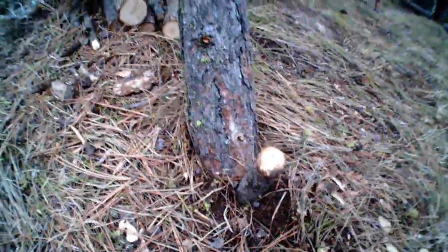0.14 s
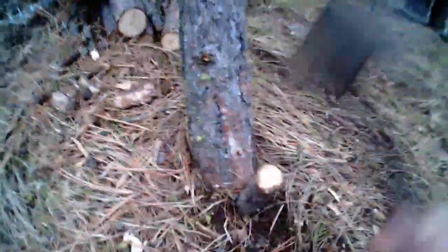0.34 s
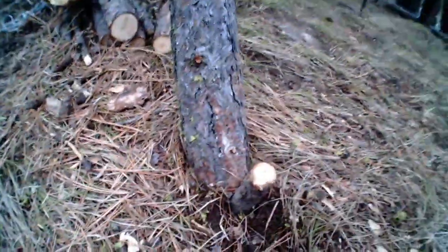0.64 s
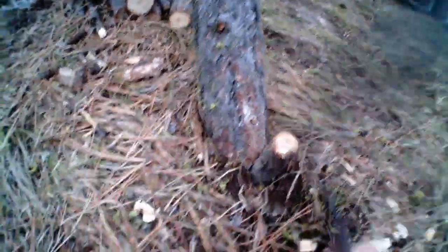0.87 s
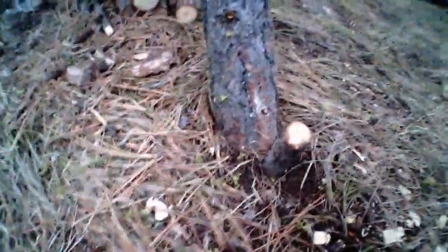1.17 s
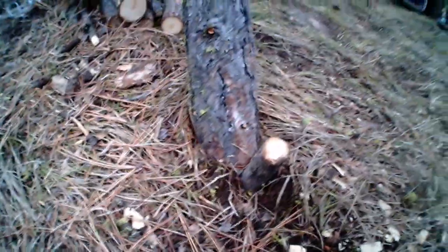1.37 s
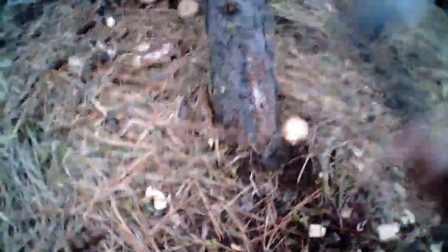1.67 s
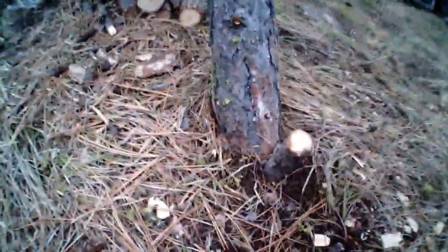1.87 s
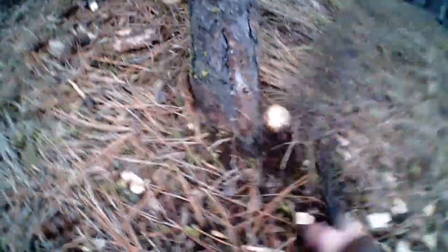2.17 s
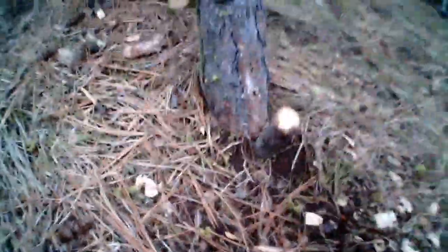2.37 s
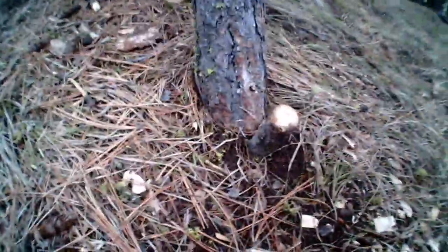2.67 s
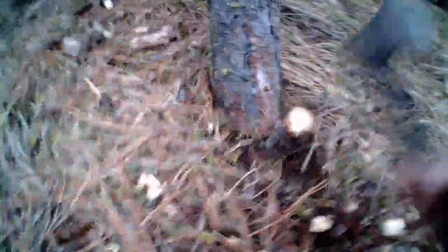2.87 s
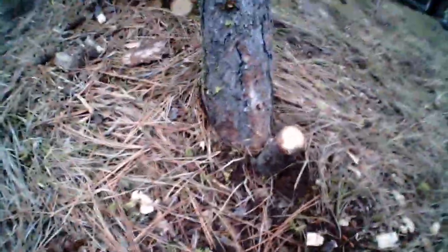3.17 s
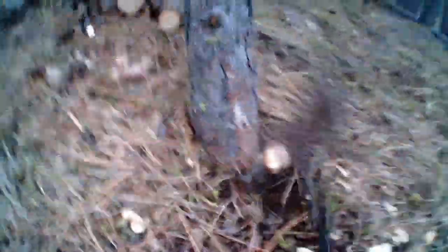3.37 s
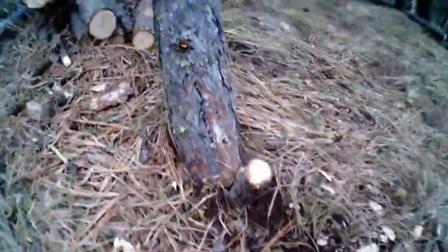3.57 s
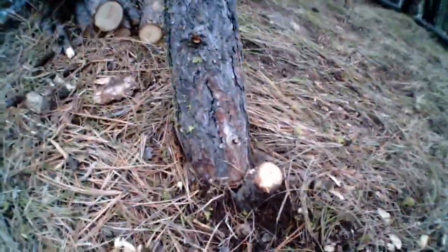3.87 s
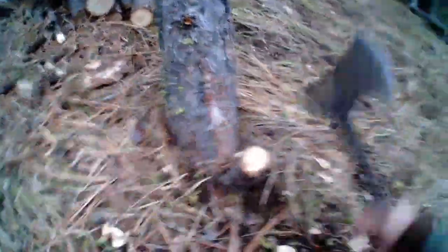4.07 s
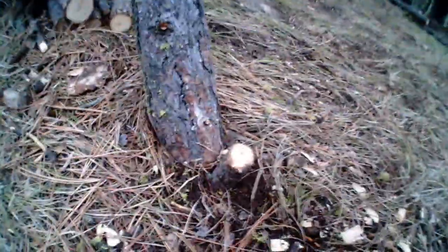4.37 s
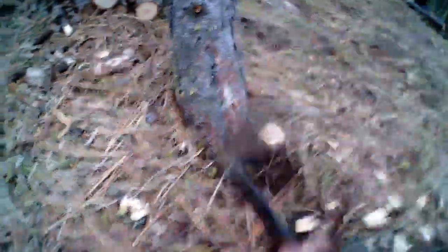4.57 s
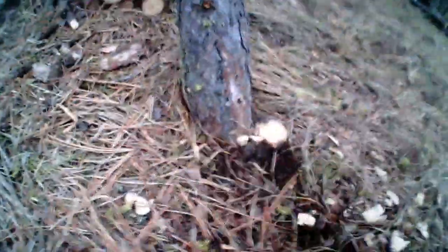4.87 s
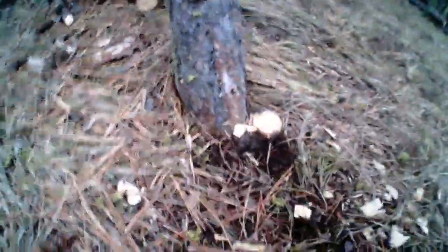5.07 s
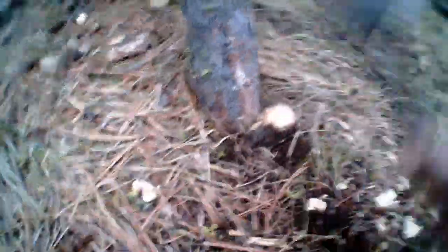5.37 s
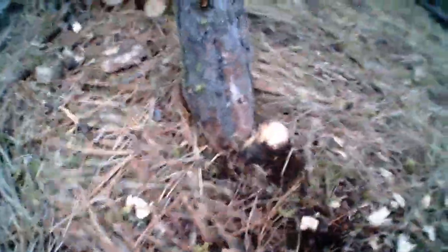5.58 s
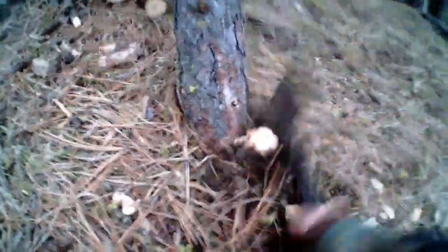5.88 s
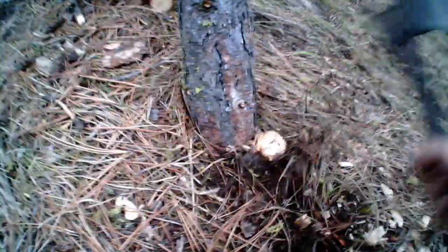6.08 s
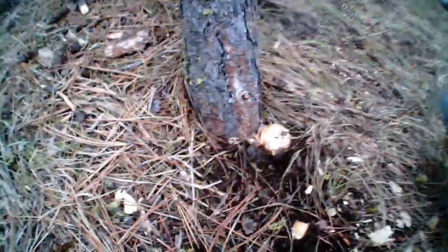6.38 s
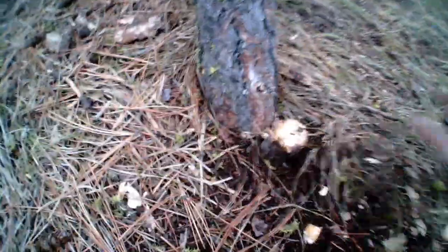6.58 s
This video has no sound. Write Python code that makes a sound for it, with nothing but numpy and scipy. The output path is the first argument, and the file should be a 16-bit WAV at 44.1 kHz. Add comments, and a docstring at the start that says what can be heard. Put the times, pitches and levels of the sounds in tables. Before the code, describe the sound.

A quiet forest bed of soft hiss and low rumble runs throughout, picked up by a small, close microphone. After a few tiny dull pops, a hatchet head strikes a wooden stake at about 0.4 seconds, then at 1.0, 1.5, 2.1, 2.6, 3.2, 3.7 and 4.3. Each swing swishes and brushes dry needles just beforehand; the blow is a loud, dry, overloaded woody crack with a short thump sinking in pitch, a brief high steel ring and a low answer from the ground. A short scattered echo and dull rustle die away, with pops and gritty crumbs between blows, clearest after 2.1, 2.7, 3.3 and 4.4. The ninth blow, near 4.9, is weaker and lands twice in quick succession. Then hammering stops: litter stirs lightly, with soft low bumps around 5.4 to 5.5, and faint rustling continues to about 6.7 seconds.

```python
"""Forest floor beside a trunk: the back of a hatchet drives a wooden stake into needle-covered ground.
Each swing swishes and brushes the litter (shaped noise); the blow cracks, thumps and rings the steel
head (decaying sines), a scattered echo follows, then crumbs fall (short noise puffs).
A quiet forest hiss and low rumble (coloured noise) lie under it all; the close, small microphone overloads."""
import sys
import numpy as np
from scipy import signal
from scipy.fft import rfft, irfft
from scipy.io import wavfile

SR = 44100
rng = np.random.default_rng(int(sys.argv[2]) if len(sys.argv) > 2 else 0)


def store_pcm(level_fs):
    """Save levels as 16-bit WAV."""
    pcm = np.round(np.clip(level_fs, -1, 1) * 32767).astype(np.int16)
    wavfile.write(sys.argv[1], SR, np.atleast_2d(pcm).T)


N = 296788
TIME_S = np.arange(N) / SR


def amp(db):
    """Decibels to gain."""
    return 10 ** (np.asarray(db, float) / 20)


def add_at(out, start_s, sound):
    """Mix a sound into out, in place, from the given time."""
    out[round(start_s * SR):][:len(sound)] += sound


def clicks(times_s, gains):
    """Single samples of the given heights, on a floor too faint to hear."""
    out = np.full(N, 1e-18)
    np.add.at(out, np.round(np.asarray(times_s) * SR).astype(int), gains)
    return out


def fade(x, t60_s):
    """A unit click becomes a level that dies away exponentially, 60 dB per t60."""
    return signal.lfilter([1], [1, -amp(-60 / (t60_s * SR))], x)


def coloured(spectrum):
    """Noise of rms 1 with the given spectrum, interpolated over log frequency."""
    hz, db = np.transpose(spectrum)
    grid_hz = np.fft.rfftfreq(N, 1 / SR) + 1    # +1 avoids log(0)
    gain = amp(np.interp(np.log(grid_hz), np.log(hz), db))
    x = irfft(rfft(rng.standard_normal(N)) * gain, N)
    return x / x.std()


def lumpy(rate_hz, depth_db):
    """A gain that wanders randomly at about the given rate: low-passed noise, read in dB."""
    knot_hz = 400
    knots = rng.standard_normal(int(N / SR * knot_hz) + 2)
    r = np.exp(-2 * np.pi * rate_hz / knot_hz)
    slow = signal.lfilter([1], [1, -r], knots) * np.sqrt(1 - r * r)
    return amp(depth_db * np.interp(TIME_S * knot_hz, np.arange(len(slow)), slow))


# microphone housing resonances: (f/Hz, width/Hz, level/dB)
HOUSING_MODES = [(1463, 280, 9), (3870, 710, -3), (6740, 530, -10.5), (9500, 1500, -35),
                 (14000, 3200, -36.5)]


def housing(x):
    """Broad parallel resonances, alternating in sign, colour bright noise near the microphone."""
    out = 0
    for k, (hz, width_hz, db) in enumerate(HOUSING_MODES):
        r = np.exp(-np.pi * width_hz / SR)
        zeros = (1 - r * r) / 2 * np.array([1, 0, -1])
        poles = [1, -2 * r * np.cos(2 * np.pi * hz / SR), r * r]
        out = out + (-1) ** k * amp(db) * signal.lfilter(zeros, poles, x)
    return out


HISS_DB = -52
# forest hiss and rumble, relative spectrum: (f/Hz, density/dB)
HISS_SPECTRUM = [(14, 2), (25, 1.5), (60, -11.5), (120, -8), (250, -15.5), (600, -19), (1900, -14.5),
                 (2700, -21), (4200, -22.5), (5500, -32.5), (7000, -30), (9500, -44), (15600, -48.5),
                 (15900, -75.5)]


def forest():
    """Steady coloured noise whose level wanders slightly."""
    return amp(HISS_DB) * coloured(HISS_SPECTRUM) * lumpy(3.8, 0.22)


SWISH_DB, SWISH_S = -37.5, 0.052
RUSTLE_DB, RUSTLE_T60_S = -19, 0.19
RUSTLE_FOLLOWS = 0.75    # dB of rustle per dB of echo
FALL_S = 0.066           # blow to loudest patter
GRAIN_DB = 2.5           # fast unevenness
DULL_TOP_HZ = 4500       # low-pass on swish and rustle
# needle noise, relative spectrum: (f/Hz, density/dB)
NEEDLE_SPECTRUM = [(150, 8.5), (400, 4.5), (1000, 1.5), (1600, 1.5), (2500, -16.5), (4000, -10.5),
                   (7000, -23.5), (11000, -26.5)]
# slow stir of the litter, livelier after the last blow: (t/s, level/dB)
STIR_LEVELS = [(0.0, -57.5), (4.85, -57.5), (5.1, -55), (5.3, -56), (5.45, -51.5), (5.6, -51.5),
               (5.79, -50.5), (5.87, -57.5), (6.05, -53), (6.2, -56.5), (6.73, -54)]
# blows on the stake, the last landing twice: (t/s, head's freedom to ring [0-1], crack level/dB,
# crack f/Hz, thump level/dB, thump starting f/Hz, share of thump f lost [0-1], thump length/s,
# ground level/dB, bend level/dB, twist level/dB, echo level/dB, falling dirt level/dB)
HITS = [(0.373, 0.98, 15.5, 1291, 6.5, 240, 0.14, 0.0049, -10.5, -15.5, -46.5, -11, -65),
        (0.9666, 0.61, 9, 1247, 5.5, 255, 0.09, 0.0058, -12, -0.5, -37, -8, -55),
        (1.5283, 0.31, 6.5, 1240, 3.5, 238, 0.05, 0.0075, -10.5, -0.5, -46, -8, -52.5),
        (2.0880, 0.65, 8, 1220, 2, 260.3, 0.2, 0.0089, -9, -2.5, -50, -9.5, -57),
        (2.6294, 0.42, 16, 1271, 7, 235.5, .04, 0.0075, -9, -5, -33, -7, -52.5),
        (3.1687, 0.3, 10.5, 1128, 11, 248, 0.14, 0.0063, -8.5, -21, -60, -10, -54),
        (3.7168, 0.7, 10, 1226, 7.5, 329, 0.62, 0.0067, -13.5, -4.5, -46, -19, -53),
        (4.2855, .9, 11, 1306, 3, 233.6, 0.09, 0.0094, -12.5, -10.5, -46, -10.5, -48),
        (4.8563, 0.74, -1, 1066, -3, 243.5, 0.03, 0.015, -16.5, -13.5, -58, -20, -51.5),
        (4.8633, 0.4, -6.5, 910, 3.5, 187.5, 0.61, 0.0084, -8, -31, -62, -41.5, -70)]


def litter():
    """Needle noise: dull swish into each blow, dull rustle dying after it, later patter of dirt, slow stir."""
    s, echo_db, dirt_db = np.transpose(HITS)[[0, 11, 12]]
    lead_s = s[:, None] - TIME_S
    swung = np.diff(s, prepend=0) > .1    # the second landing has no swing of its own
    swish = amp(SWISH_DB) * swung @ (np.exp(-(lead_s / SWISH_S) ** 2) * (lead_s > 0))
    rustle = fade(clicks(s, amp(RUSTLE_DB + RUSTLE_FOLLOWS * echo_db)), RUSTLE_T60_S)
    since = np.maximum(-lead_s, 0) / FALL_S
    patter = amp(dirt_db) @ (since * np.exp(1 - since))
    stir = amp(np.interp(TIME_S, *np.transpose(STIR_LEVELS)))
    needles = coloured(NEEDLE_SPECTRUM) * lumpy(50, 2.1) * lumpy(150, GRAIN_DB)
    dull = signal.lfilter(*signal.butter(2, DULL_TOP_HZ, fs=SR), needles)
    return dull * (swish + rustle) + needles * (patter + stir)


# dull pops, low ones like bumps on the ground: (t/s, level/dB, f/Hz)
DULL_POPS = [(0.0195, -26, 510), (0.0215, -25, 1070), (0.0405, -34, 476), (0.3575, -32, 1220),
             (0.5045, -23.5, 790), (0.8735, -35.5, 605), (0.9205, -29, 900), (0.933, -27, 960),
             (0.948, -25, 330), (1.0815, -21, 805), (1.6925, -22.5, 790), (2.2725, -26, 640),
             (2.8055, -24.5, 696), (3.2825, -28.5, 630), (3.4845, -37, 430), (3.6385, -32.5, 373),
             (3.730, -14.5, 124), (3.8465, -29.5, 460), (3.8715, -33.5, 530), (3.9485, -37.5, 750),
             (4.043, -47, 303), (4.4395, -19.5, 920), (4.8025, -33, 750), (5.0865, -41.5, 371),
             (5.414, -34.5, 109), (5.427, -43, 157), (5.433, -38.5, 262), (5.442, -37, 117),
             (5.459, -27.5, 182), (5.47, -42, 305), (5.5025, -37, 600)]
# swing brushing the litter just before a blow:
# (t/s, grit level/dB, treble level/dB, pop level/dB, pop f/Hz)
SWING_BRUSHES = [(0.333, -20, -11, -21.5, 1200), (0.930, -19, -12, -22.5, 1000), (1.5, -10.5, 3, -7, 1290),
                 (2.051, -12, -9, -15.5, 1270), (2.601, -15, -6, -29.5, 373),
                 (3.1392, -8.5, -36, -22.5, 746), (3.685, -9.5, -24, -27, 506), (4.2515, -25, 7, -24, 800),
                 (4.816, -18.5, -18, -28, 900)]


def pops():
    """Pops, also one with each brush: a sine of a cycle or two under a Gaussian swell."""
    out = np.zeros(N)
    t = np.arange(SR // 10) / SR
    brush_pops = [(s, db, hz) for s, _, _, db, hz in SWING_BRUSHES]
    for s, db, hz in list(DULL_POPS) + brush_pops:
        turns = hz * t - 1.2
        swell = np.exp(-(turns / 0.53) ** 2)
        add_at(out, s, amp(db) * swell * np.sin(1.1 - 2 * np.pi * turns))
    return out


BRUSH_T60_S, BRUSH_BODY_DB = .01, -10.5
CRUMB_BODY_DB, BODY_PER_TREBLE = -22.5, -1.02    # brighter crumb, thinner body
LANDING_S = 0.00055    # rise time constant
# crumbs and twigs landing: (t/s, level/dB, t60/s, treble level/dB)
FALLEN_CRUMBS = [(2.162, -7.5, 0.0086, 0.5), (2.184, -13, 0.011, -22), (2.1872, -8, 0.016, -5),
                 (2.224, -28, 0.0068, 15), (2.702, -26, 0.0089, 5), (2.71, -17.5, 0.02, -19),
                 (2.7354, -19, 0.018, -1), (2.742, -26.5, 0.016, 9.5), (2.762, -25.5, 0.01, 14.5),
                 (3.2536, -26, 0.0094, 11), (3.276, -31, 0.015, 12), (3.288, -28, 0.012, 11),
                 (3.314, -22, 0.013, 0), (3.3332, -31.5, 0.013, 13), (3.337, -36, 0.0085, 8),
                 (3.36, -38, 0.014, 12), (3.739, -8, 0.0027, -19), (4.358, -21, 0.011, 5.5),
                 (4.365, -25, 0.011, 7), (4.398, -20.5, 0.015, -2), (4.407, -23, 0.013, 0),
                 (4.419, -24.5, 0.013, 11), (4.888, -18, 0.011, -26), (4.926, -18.5, 0.0035, 14.5),
                 (4.948, -22, 0.0077, 3)]


def crumbs():
    """Each crumb or brush is a short gritty noise puff with its own share of body and treble."""
    puffs = []
    for s, db, t60_s, treble_db in FALLEN_CRUMBS:
        puffs.append((s, db, t60_s, treble_db, CRUMB_BODY_DB + BODY_PER_TREBLE * treble_db))
    for s, db, treble_db, *_ in SWING_BRUSHES:
        puffs.append((s, db, BRUSH_T60_S, treble_db, BRUSH_BODY_DB))
    grit, body = np.zeros((2, N))
    t = np.arange(2048) / SR
    for s, db, t60_s, treble_db, body_db in puffs:
        envelope = amp(db - 60 * t / max(t60_s, .002)) * (1 - np.exp(-t / LANDING_S))
        puff = rng.standard_normal(len(t)) * envelope
        dull = signal.lfilter(*signal.butter(1, 2200, fs=SR), puff)
        add_at(grit, s, dull + (puff - dull) * amp(treble_db))
        add_at(body, s, puff * amp(body_db))
    body_band = signal.butter(1, [350, 1100], "band", fs=SR)
    return housing(grit) + signal.lfilter(*body_band, body)


# steel head bending, t60 when fully free: (f/Hz, level/dB, t60/s)
BEND_MODES = [(2918, 0, .055), (8108, -13, .045), (13945, -27, .05)]
# steel head twisting: (f/Hz, level/dB, t60/s)
TWIST_MODES = [(5211, 0, .13), (5814, -1, .14), (12510, -8, .06)]


def steel():
    """Head modes ring on, levels set per blow: bending is cut short by the wood, the fainter twist is not."""
    out, t = np.zeros(N), np.arange(SR // 4) / SR
    for s, freedom, bend_db, twist_db in np.array(HITS)[:, [0, 1, 9, 10]]:
        for modes, blow_db, share in ((BEND_MODES, bend_db, freedom), (TWIST_MODES, twist_db, 1)):
            for hz, db, t60_s in modes:
                decay = amp(blow_db + db - 60 * t / (t60_s * share))
                add_at(out, s, decay * np.sin(2 * np.pi * hz * t))
    return out


CONTACT_S = .0003                         # loading time constant of the end grain
PUFF_DB, PUFF_T60_S = -4.5, 0.015         # splinters, dB relative to the crack
ECHO_S, ECHO_T60_S = 0.011, 0.034
# struck end grain: (f as a multiple of the crack f, level/dB, t60/s)
GRAIN_MODES = [(1.002, 8.5, 0.007), (1.38, 5, 0.0089), (1.9, -8, 0.0071), (2.601, 2, 0.0049)]


def crack():
    """End grain modes at levels varying per blow, a splintering puff, scattered echo from trunk and ground."""
    times_s, crack_db, crack_hz, echo_db = np.transpose(HITS)[[0, 2, 3, 11]]
    wood, t = np.zeros(N), np.arange(SR // 20) / SR
    load = 1 - np.exp(-t / CONTACT_S)
    for s, blow_db, hz in zip(times_s, crack_db, crack_hz):
        for multiple, level_db, t60_s in GRAIN_MODES:
            own_db = rng.normal(0, 1.5)
            decay = amp(blow_db + level_db + own_db - 60 * t / t60_s)
            add_at(wood, s, decay * np.sin(2 * np.pi * multiple * hz * t) * load)
    splinters = fade(clicks(times_s, amp(crack_db + PUFF_DB)), PUFF_T60_S)
    puff = housing(rng.standard_normal(N) * splinters)
    arrivals = clicks(times_s + ECHO_S, amp(echo_db))
    swell = fade(arrivals, ECHO_T60_S) - fade(arrivals, 0.004)    # soft onset
    return wood + puff + housing(rng.standard_normal(N) * swell)


THUMP_LAG_S = .001                            # phase lag of the swing
SAG_S = 0.0085                                # time constant of the pitch drop as the stake gives
OVERTONE_DB, OVERTONE_RATIO = -8.5, 1.775     # relative to the thump
# stake lingering after the thump: (f as a multiple of the thump f, level/dB, t60/s)
STAKE_MODES = [(0.968, -24.5, 0.083), (1.349, -1.5, 0.027), (1.9, -22.5, 0.029)]
# ground under the stake: (f/Hz, level/dB, t60/s, lag/s)
GROUND_MODES = [(79.2, -0.5, 0.11, 0.0032), (46.3, -14.5, 0.091, 0.0017)]


def thump():
    """The stake swings a few times, sinking in pitch, until the soil grips it; the ground answers later, lower."""
    out = np.zeros(N)
    t = np.arange(SR // 3) / SR
    for s, _, _, _, thump_db, hz, sag, length_s, ground_db, *_ in HITS:
        sunk_s = np.clip(sag, 0, .8) * (t - SAG_S * (1 - np.exp(-t / SAG_S)))
        # starts at negative phase: first gives way, then springs back
        phase = 2 * np.pi * hz * (t - THUMP_LAG_S - sunk_s)
        push = np.sin(phase) + amp(OVERTONE_DB) * np.sin(OVERTONE_RATIO * phase)
        push *= np.exp(-(t / length_s) ** 2)
        for multiple, db, t60_s in STAKE_MODES:
            push += amp(db - 60 * t / t60_s) * np.sin(multiple * phase)
        push *= amp(thump_db) * (1 - np.exp(-t / 0.000091))
        for low_hz, db, t60_s, lag_s in GROUND_MODES:
            late = np.maximum(t - lag_s, 0)
            push -= amp(ground_db + db - 60 * late / t60_s) * np.sin(2 * np.pi * low_hz * late)
        add_at(out, s, push)
    return out


def scene():
    """All sources summed at one microphone."""
    return (forest() + litter() + pops() + crumbs() + steel() + crack() + thump())[None]


NOTCH_HZ, NOTCH_WIDTH_HZ = 11000, 3500
OFFSET = -.004
CUTOFF_HZ = 16500    # stopband edge


def record(dry):
    """Port notch in the treble, input overload into flat tops, slight offset from zero, steep top cut."""
    w, r = 2 * np.pi * NOTCH_HZ / SR, np.exp(-np.pi * NOTCH_WIDTH_HZ / SR)
    deep = r ** .12    # zero radius: nearer 1 digs deeper
    zeros = np.array([1, -2 * deep * np.cos(w), deep ** 2])
    poles = np.array([1, -2 * r * np.cos(w), r * r])
    heard = signal.lfilter(zeros * poles.sum() / zeros.sum(), poles, dry)    # unity gain at 0 Hz
    flat = np.clip(heard, -.985, .99) + OFFSET
    top_cut = signal.cheby2(16, 50, CUTOFF_HZ, fs=SR, output="sos")
    return np.clip(signal.sosfilt(top_cut, flat), -1, 1)


dry = scene()
out = record(dry)
store_pcm(out)
```